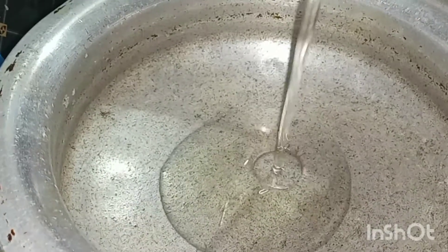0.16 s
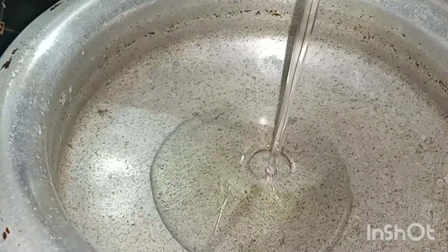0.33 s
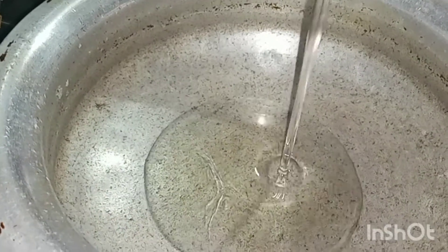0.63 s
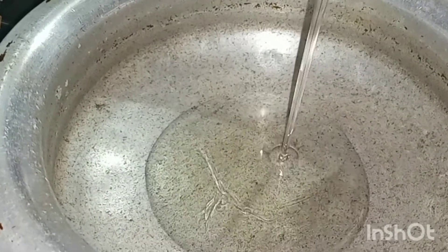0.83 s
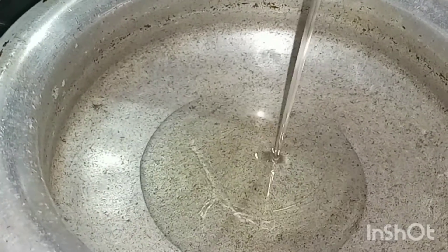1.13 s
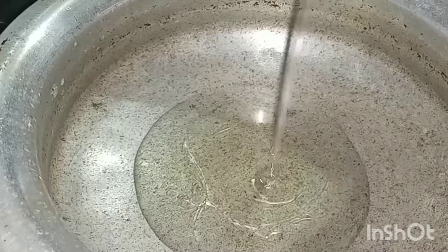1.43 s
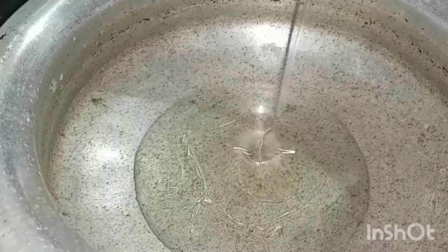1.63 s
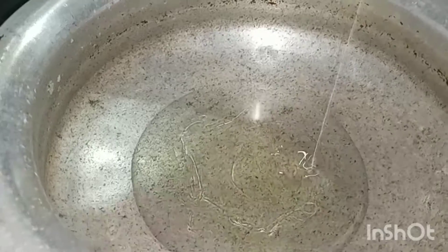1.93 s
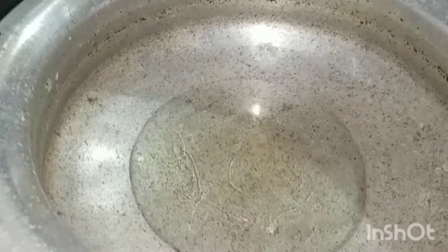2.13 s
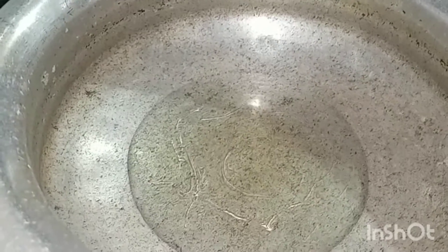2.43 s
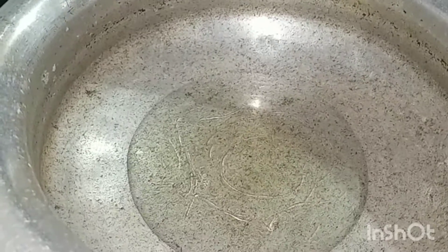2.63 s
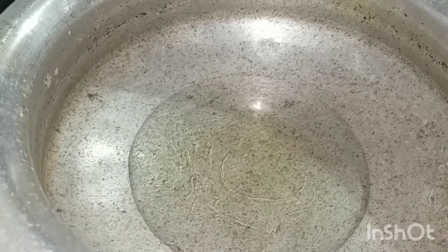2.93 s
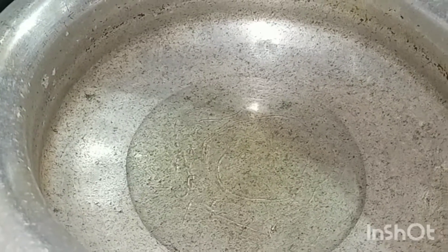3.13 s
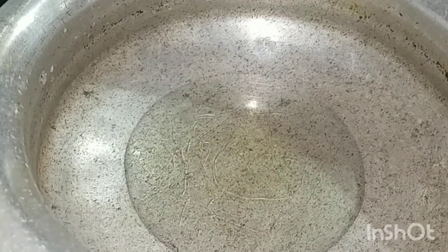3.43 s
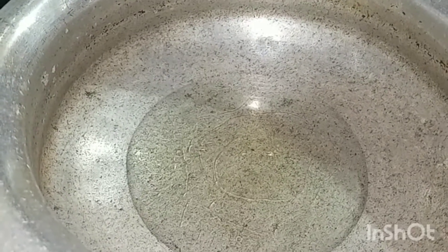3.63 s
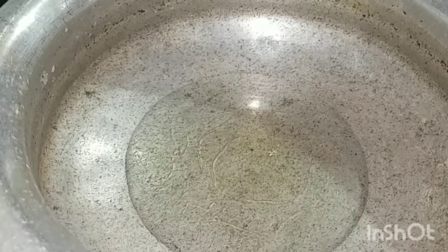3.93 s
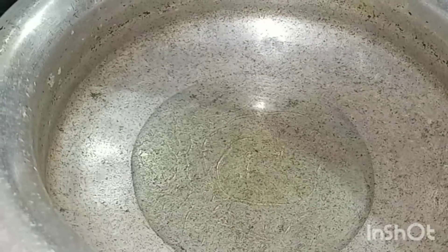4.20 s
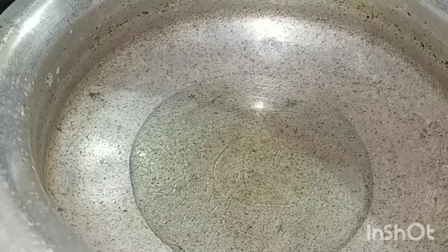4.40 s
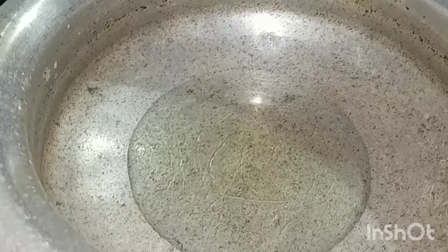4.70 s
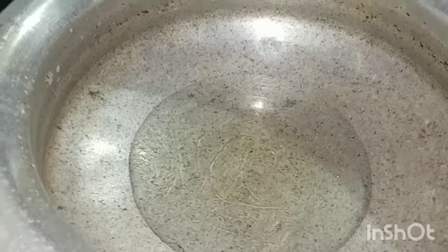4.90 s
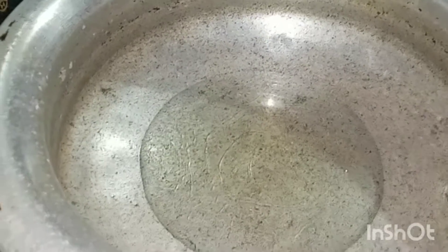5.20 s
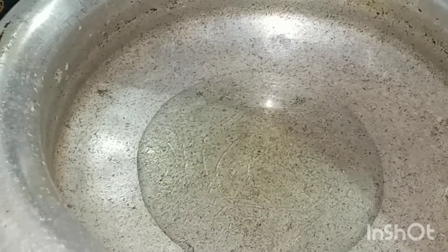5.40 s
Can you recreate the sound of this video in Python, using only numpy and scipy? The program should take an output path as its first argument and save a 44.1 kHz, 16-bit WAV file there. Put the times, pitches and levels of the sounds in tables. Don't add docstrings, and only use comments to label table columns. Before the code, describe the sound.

Steady bright gas flame hiss with small oil pops, one glass clink, a cluster of hollow set-down knocks, then sharp metallic bangle jingles.

```python
import sys
import numpy as np
from scipy import signal
from scipy.fft import rfft, irfft, next_fast_len
from scipy.io import wavfile
from scipy.ndimage import uniform_filter1d, map_coordinates

SR = 44100
rng = np.random.default_rng(int(sys.argv[2]) if len(sys.argv) > 2 else 0)


def materialize(psi):
    bounded = np.clip(np.atleast_2d(psi).T, -1, 1)
    quanta = np.round(bounded * 32767).astype(np.int16)
    wavfile.write(sys.argv[1], SR, quanta)


def linear_from_db(decibels):
    return 10 ** (np.asarray(decibels, float) / 20)


N = 244755


def unit(x):
    return x / np.sqrt(np.mean(x ** 2) + 1e-20)


def along(points, hz):
    f, v = np.transpose(points)
    return np.interp(np.log(hz + 1), np.log(f + 1), v)


def curves(rows):
    s, *cols = np.transpose(rows)
    return [np.interp(np.arange(N) / SR, s, c) for c in cols]


def wobble(rate):
    knots = rng.standard_normal(int(N * rate / SR) + 4)
    return map_coordinates(knots, [np.arange(N) * rate / SR])


def filtered(x, response):
    m = next_fast_len(x.shape[-1] + SR // 2)
    return irfft(rfft(x, m) * response(np.fft.rfftfreq(m, 1 / SR)), m)[..., :x.shape[-1]]


def resonances(modes):
    def response(f):
        total = 0
        for k, (centre, width, db) in enumerate(modes):
            damping = 1j * f * width
            total = total + (-1) ** k * linear_from_db(db) * damping / (centre * centre - f * f + damping)
        return total
    return response


# f/Hz, likeness [0..1]
PORT_LIKENESS = [(30, 0.1), (80, 0.58), (140, 1), (300, 0.88), (480, 0.6), (580, 0.95), (750, 0.29),
                 (950, 0.069), (2500, 0.35), (4000, 0.021), (16000, 0.13)]


def ports(pair, response=lambda hz: 1):
    def mix(hz):
        turn = np.arccos(np.clip(along(PORT_LIKENESS, hz), 0, 1)) / 2
        return response(hz) * np.array([np.cos(turn), np.sin(turn)])
    mid, side = filtered(pair, mix)
    return np.array([mid + side, mid - side])


def rush(response, patchy_db, ripple_db=0):
    z = signal.stft(rng.standard_normal((2, N)), nperseg=1024)[2]
    field = uniform_filter1d(rng.standard_normal(z.shape[1:]), size=7, axis=0)
    field = uniform_filter1d(field, size=4, axis=1)
    ripple = uniform_filter1d(rng.standard_normal((z.shape[1], 1)), size=2, axis=0)
    gain = linear_from_db(patchy_db * unit(field) + ripple_db * unit(ripple))
    pair = signal.istft(z * gain, nperseg=1024)[1][:, :N]
    return unit(ports(pair, response))


def shaped_rush(spectrum, patchy_db, ripple_db=0):
    return rush(lambda hz: linear_from_db(along(spectrum, hz)), patchy_db, ripple_db)


def puffs(times, levels_db, t60s, rise):
    out, t = np.zeros(N + SR), np.arange(SR // 3) / SR
    for s, db, t60 in zip(times, levels_db, t60s):
        out[round(s * SR):][:len(t)] += linear_from_db(db - 60 * t / (t60 + 0.0092)) * (1 - np.exp(-t / rise))
    return out[:N]


def struck(events, modes, scatter_db):
    out, t = np.zeros(N + SR), np.arange(SR // 3) / SR
    hz, level, t60 = np.transpose(modes)[:, :, None]
    onset = 1 - np.exp(-t / 0.00065)
    for s, db, damp in events:
        luck = rng.standard_normal((2, len(modes), 1))
        decay = linear_from_db(level + scatter_db * luck[0] - 60 * t / (t60 * damp + 0.011))
        ring = decay * np.sin(2 * np.pi * hz * t + 2 * np.pi * luck[1])
        out[round(s * SR):][:len(t)] += linear_from_db(db) * ring.sum(axis=0) * onset
    return out[:N]


def touches(events, rise):
    out, t = np.zeros(N + SR), np.arange(SR // 5) / SR
    for s, db, hz, t60 in events:
        ring = linear_from_db(db - 60 * t / (t60 + 0.0021)) * np.sin(2 * np.pi * hz * t)
        out[round(s * SR):][:len(t)] += ring * (1 - np.exp(-t / (rise + 0.63 / hz)))
    return out[:N]


# t/s, level/dB
GAS_FLOW = [(0.0, -37.5), (0.08, -37.5), (1.79, -36.5), (2.19, -42), (2.22, -38.5), (2.44, -37.5),
            (3.28, -37.5), (3.29, -31.5), (3.46, -40.5), (3.63, -34.5), (3.92, -38), (3.96, -32.5),
            (4.05, -32), (4.3, -45), (4.34, -32.5), (4.44, -36.5), (5.32, -37.5), (5.55, -34.5)]
# t/s, level/dB (peak), low part/dB, t60/s
SPUTTERS = [(0.131, -36, -17, 0.038), (0.1665, -32, -8, 0.066), (0.416, -26, -4, 0.035),
            (0.9484, -16.5, -21, 0.03), (1.082, -19, -15, 0.032), (1.2276, -34, -20, 0.16),
            (1.318, -14, -4, 0.017), (2.2144, -34.5, 7, 0.98), (2.319, -18.5, -6, 0.049),
            (2.707, -23, -1.5, 0.061), (2.871, -31, -3, 0.13), (2.922, -22.5, -7, 0.085),
            (3.129, -34.5, 1, 0.33), (3.2854, -24, -27, 0.042), (4.2278, -27, -17, 0.65),
            (4.414, -22, -20, 0.027), (4.418, -19, -29, 0.015), (4.243, -26, -19, 0.026),
            (4.551, -28.5, 1, 0.066), (4.6734, -20.5, -7, 0.036), (4.842, -30, -5, 0.045),
            (5.0384, -30, -4, 0.13), (5.098, -25, -17, 0.083), (5.2594, -27, -14, 0.032),
            (5.3567, -31, -4, 0.064), (5.409, -27, 2, 0.028), (5.4407, -23.5, -8, 0.049)]
# t/s, level/dB (peak)
OIL_SPITS = [(0.2244, -42), (0.2418, -28), (0.3536, -29), (0.4464, -38), (0.9184, -45), (0.9477, -18),
             (1.0839, -43), (1.2226, -29), (1.3179, -39), (1.5204, -22), (1.932, -32), (2.1066, -40),
             (2.9644, -27), (2.9784, -30), (3.2394, -25), (3.2594, -28), (3.3877, -28), (4.9516, -35)]
# t/s, level/dB, t60/s
OIL_POPS = [
    (.951, -29, .02),
    (2.2144, -9.5, 0.006),
    (2.721, -24, 0.0092),
    (3.129, -30, 0.0069),
    (3.14, -25, .008),
    (3.2255, -27, .008),
    (3.385, -16, .008),
    (4.421, -31, 0.012),
    (5.4125, -30, .006),
]
# f/Hz, level/dB (per Hz)
FLAME_SPECTRUM = [(900, -37), (1300, -15.5), (1500, -9), (2000, -2), (2800, 1.5), (3600, 2.5), (4500, 1.5),
                  (5300, -3), (7000, -23.5)]
JET_SPECTRUM = [(4000, -36), (5300, -5.5), (6200, 2), (7400, 0), (8300, -7.5), (9300, -11.5), (11000, -30)]
FIZZ_SPECTRUM = [(7500, -43), (9500, 6.5), (11000, 11), (13000, -0.5), (14000, -7), (15000, 18),
                 (15800, 16.5), (16500, -25)]
# f/Hz, level/dB
DULLED_JET = [(5000, 0), (6400, 3), (7300, -1.5), (8500, -5), (11000, 2)]
FLAME_DB, JET_DB, FIZZ_DB = -35, -35.5, -46.5
FLAME_GROWS, JET_GROWS, FIZZ_GROWS = 0.43, 0.74, 0.21
DULL_S, DULL_LASTS_S = 4.23, .25


def burner():
    strength_db, = curves(GAS_FLOW)
    flow_db = strength_db - strength_db.mean()
    flicker = wobble(14)
    flame = linear_from_db(FLAME_DB + FLAME_GROWS * flow_db + 0.7 * flicker + 0.8 * wobble(24.84))
    jet = linear_from_db(JET_DB + JET_GROWS * flow_db + 0.5 * flicker + 0.81 * wobble(29.9))
    fizz = linear_from_db(FIZZ_DB + FIZZ_GROWS * flow_db + 1.0 * flicker + 0.85 * wobble(17))

    s, db, low_db, t60 = np.transpose(SPUTTERS)
    pops = puffs(*np.transpose(OIL_POPS), rise=0.00029)
    flame += puffs(s, db + low_db - 6.5, t60 * 1.19, rise=0.004) + linear_from_db(-11.5) * pops
    jet += puffs(s, db - 7.5, t60, rise=0.00064) + linear_from_db(-12.5) * pops
    spit_t60s = [0.034] * len(OIL_SPITS)
    fizz += linear_from_db(-6.5) * puffs(*np.transpose(OIL_SPITS), spit_t60s, rise=0.0021)

    open_jet = shaped_rush(JET_SPECTRUM, patchy_db=2.5, ripple_db=0.47)
    dull_jet = filtered(open_jet, lambda hz: linear_from_db(along(DULLED_JET, hz)))
    dulled = np.clip((np.arange(N) / SR - DULL_S) / DULL_LASTS_S, 0, 1)
    hiss = flame * shaped_rush(FLAME_SPECTRUM, patchy_db=2.0, ripple_db=1.0)
    hiss += jet * ((1 - dulled) * open_jet + dulled * dull_jet)
    return hiss + fizz * shaped_rush(FIZZ_SPECTRUM, patchy_db=2.8)


# t/s, length/s, level/dB
TUBE_SURGES = [(0.055, 0.024, -50.5), (0.362, 0.025, -53), (0.493, 0.028, -51), (0.577, 0.17, -50),
               (0.924, 0.062, -52.5), (1.27, 0.054, -47.5), (1.419, 0.058, -53), (1.685, 0.027, -54),
               (1.786, 0.034, -53.5), (1.92, 0.042, -52), (2.028, 0.12, -51), (2.24, 0.16, -46),
               (2.551, 0.048, -53), (2.67, 0.11, -50.5), (3.087, 0.043, -48.5), (3.212, 0.11, -53),
               (3.695, 0.034, -52), (3.775, 0.029, -58), (4.02, 0.09, -53.5), (4.16, 0.059, -50),
               (4.422, 0.23, -50.5), (4.694, 0.15, -50.5), (4.985, 0.37, -47), (5.41, 0.16, -52)]
CATCH_S, FADE_S, IDLE_DB = 0.012, 0.021, -61.5


def surges():
    t = np.arange(N) / SR
    level = linear_from_db(IDLE_DB)
    for s, length, db in TUBE_SURGES:
        corners = np.cumsum([s - CATCH_S, CATCH_S, length, FADE_S])
        level = level + linear_from_db(db) * np.interp(t, corners, [0, 1, 1, 0])
    return level


def tube():
    bore = resonances([(148.1, 20.4, 0)])
    sung = unit(ports(rng.standard_normal((2, N)), lambda hz: bore(hz) ** 2))
    swing = np.sqrt(abs(uniform_filter1d((sung ** 2).mean(axis=0), size=600)))
    return linear_from_db(-0.5) * surges() * unit(sung / (swing + 2.3))


# f/Hz, width/Hz, level/dB
PAN_MODES = [(1465, 99, 1.5), (2011, 37, 1), (819, 29, -4)]


def pan():
    metal = resonances(PAN_MODES)
    return linear_from_db(-49 + 2.6 * wobble(4.77)) * rush(lambda hz: metal(hz) ** 2, patchy_db=4.0)


# t/s, level/dB (peak), decay factor, chatter/dB
JINGLES = [(2.2448, -34, .8, 11), (2.3206, -22.5, 0.98, 9.5), (2.476, -21.5, 0.24, 9),
           (3.3882, -33, 0.84, 10), (3.7554, -31, 0.56, 0), (3.7708, -34, 0.56, 5), (3.8057, -23.5, .5, -8),
           (3.8417, -33, .9, 6), (3.9458, -10, 0.2, -14), (3.950, -9, .2, -12), (3.954, -16, .15, -8),
           (3.9645, -10, 0.4, -12), (3.973, -16, .4, -10), (3.9895, -10, 0.4, -15),
           (3.995, -10.5, 0.34, -14), (4.0185, -14, 0.38, -5), (4.026, -16, 0.37, -14),
           (4.0385, -18, 0.33, -11), (4.048, -26, 0.27, -12), (4.318, -14, 0.57, 1), (4.345, -17, 0.57, 1),
           (4.3595, -14, 0.096, -3), (4.367, -13, 0.14, -10), (4.373, -16, .15, -6), (4.377, -28, 0.63, 3),
           (5.5398, -29, 0.41, 14.5)]
# f/Hz, level/dB, t60/s
BANGLE_MODES = [(8600, -14, 0.17), (9085, -11, 0.42), (9300, -14, 0.16), (13600, -20, 0.095),
                (14300, -12, .1), (13940, -6, .12), (14700, -7.5, 0.2), (14780, 3, .12), (14960, -2, 0.18),
                (15400, -14, .14), (15200, -16, 0.11), (15560, -7, .1), (15720, -12, .08)]
# f/Hz, level/dB (per Hz)
CHATTER_SPECTRUM = [(8000, -29), (9000, -15.5), (10500, -14.5), (12800, -27), (14000, -7), (15000, -17),
                    (16000, -0.5)]
# t/s, level/dB (peak), f/Hz, t60/s
RING_TOUCHES = [(2.2455, -38, 15700, .08), (3.9465, -18, 15560, .05), (3.947, -19, 15160, .05),
                (4.319, -25, 15300, .05), (4.3195, -25, 14200, .05), (3.974, -21, 15300, .01),
                (3.9955, -20, 15100, .01), (4.0385, -21, 15550, .03), (4.3605, -3, 15200, .012),
                (4.3675, -15, 15400, .012), (4.373, -13, 15550, .008), (4.3775, -16, 15350, .012),
                (4.3815, -21, 15200, .008), (4.385, -18, 15000, .01), (4.389, -24, 15100, .015)]


def bangles():
    s, db, damp, chatter_db = np.transpose(JINGLES)
    rings = linear_from_db(-6.5) * struck(np.transpose([s, db, damp]), BANGLE_MODES, scatter_db=0.5)
    contact = puffs(s, db + chatter_db + 1.0, 0.21 * damp, rise=0.0017)
    chatter = contact * shaped_rush(CHATTER_SPECTRUM, patchy_db=-7.0)
    return linear_from_db(-2.0) * (rings + chatter) + linear_from_db(7.5) * touches(RING_TOUCHES, rise=.0008)


def contacts(count):
    first_s, gap_s, first_db, growth_db, damp = 1.526, 0.0043, -24.5, 0.7, 0.46
    return [(first_s + gap_s * k, first_db + growth_db * k, damp) for k in range(count)]


# t/s, level/dB (peak), decay factor
CLINKS = [
    (1.3183, -23, 1),
    (1.3215, -31, 0.8),
    (1.331, -26, 0.62),
]
# t/s, level/dB (peak)
SCUFFS = [(1.252, -28), (1.265, -32), (1.4754, -23), (1.481, -26), (1.487, -30), (1.494, -24), (1.506, -33),
          (1.512, -28), (1.561, -35), (1.571, -30), (1.879, -30)]
# f/Hz, level/dB, t60/s
GLASS_MODES = [(2300, -16, 0.15), (2328, -4.5, 0.67), (2770, 11, 0.085), (2807, -2, 0.17),
               (2925, 1.5, 0.13), (3110, 1.5, 0.078), (3400, 0, 0.074), (3480, -2, 0.041),
               (3890, 11, 0.019), (4720, -0.5, .07), (4490, 6.5, 0.039), (5580, 6, .02), (6560, -15, .025),
               (7140, -8, 0.03)]
CAP_MODES = [(1885, -9, 0.26), (2217, -5, 0.11), (2300, 1.5, 0.14), (2430, -2, 0.062), (2640, -7, .06),
             (2990, -10, 0.069), (3520, -5, .06)]
BASE_MODES = [(2313, 2, 0.1), (2580, 4, 0.059), (2780, 7, 0.072), (3010, 0, 0.054), (3260, -14, 0.032),
              (3680, 3, .04)]


def bottle():
    s, db, _ = np.transpose(CLINKS)
    burst = puffs(s, db - 14, [.03], rise=0.00047) * rng.standard_normal(N)
    snap = filtered(burst, resonances([(4500, 3000, 0)]))
    clink = linear_from_db(-1.5) * struck(CLINKS, GLASS_MODES, scatter_db=0.0)
    rattle = linear_from_db(-3.0) * struck(contacts(count=6), CAP_MODES, scatter_db=3.0)
    scuff_hits = [(*hit, 0.27) for hit in SCUFFS]
    return clink + snap + rattle + linear_from_db(-5.5) * struck(scuff_hits, BASE_MODES, scatter_db=6.0)


# t/s, level/dB (peak), f/Hz, t60/s
SMALL_TAPS = [(1.3195, -18, 3890, 0.036), (1.3195, -26, 4678, .03), (1.3205, -27, 3330, .12),
              (1.33, -29, 2326, 0.37), (1.33, -30, 2891, .3), (1.4755, -16, 2530, 0.014),
              (1.481, -21, 2640, .012), (1.4875, -21, 2710, .012), (1.4935, -20, 2630, 0.015),
              (1.5327, -24, 2720, .015), (1.5387, -28, 2337, 0.09), (1.547, -26, 2929, 0.037),
              (1.7186, -24, 3680, .008), (1.8782, -22, 2320, 0.011), (1.895, -29, 2220, .03),
              (2.205, -19, 1630, .015), (2.2158, -14, 1640, .01), (2.231, -23, 1650, .012),
              (2.242, -24, 1700, .012), (2.271, -24, 1800, .012), (2.266, -27, 740, .03),
              (2.2612, -20.5, 1910, .012), (2.3031, -27, 2400, .01), (2.325, -30, 322, 0.17),
              (2.345, -28, 322, .1), (2.729, -34, 257, 0.055), (2.727, -35.5, 147, 0.053),
              (2.719, -30, 735, .03), (2.716, -33, 872, .05), (2.742, -34, 990, 0.011),
              (2.805, -36, 853, .05), (2.857, -23, 2900, .01), (3.1295, -29, 2070, 0.017),
              (3.348, -28, 3240, .01), (3.549, -29.5, 2070, 0.013), (3.556, -25, 2280, 0.0086),
              (3.8195, -26, 2670, .012)]


def taps():
    return linear_from_db(2) * touches(SMALL_TAPS, rise=.0002)


# t/s, belly level/dB, wall level/dB, edge over wall/dB
THUMPS = [(2.201, -30, -34, 8), (2.209, -40, -31, -3), (2.221, -20.5, -23.5, 1), (2.23, -20, -28, -3),
          (2.239, -35, -28, 2), (2.250, -25, -24.5, -4), (2.259, -29, -23.5, 3), (2.267, -38, -34, -6),
          (2.289, -19.5, -23.5, 2), (2.304, -26.5, -33, -7), (2.331, -25.5, -24.5, -16),
          (2.349, -28, -25, -5), (2.383, -39.5, -33, -10), (2.405, -31.5, -39.5, -6), (2.426, -40, -47, 10),
          (2.436, -51, -34, -6), (2.451, -38, -43, -3), (2.4745, -51, -53, -4), (2.705, -42, -27, -10),
          (2.717, -26, -26, -4), (2.73, -31, -27, -13), (2.739, -27, -35, -8), (2.761, -40, -38, -10),
          (2.774, -49, -33, -2), (2.801, -36, -33.5, 5), (2.819, -40, -32.5, 1), (2.857, -48, -44, -4)]
# f/Hz, width/Hz, level/dB
BELLY_MODES = [(149, 30, -5.5), (241, 35, 0.5), (322, 16, 5.5), (476, 50, -6.5)]
WALL_MODES = [(573, 93, 1), (735, 73, 0), (800, 48, 3), (968, 79, 0.5), (1110, 250, 0)]
EDGE_MODES = [(1650, 460, 1.5), (1880, 97, 9.5), (1950, 110, 9.5)]
# t/s, level/dB (peak), decay factor
RIM_RAPS = [
    (2.2045, -15, 0.25),
    (2.2155, -17.5, 0.3),
    (2.229, -18, 0.36),
]
# f/Hz, level/dB, t60/s
RIM_MODES = [(1490, -7, 0.027), (1640, -4.5, 0.026), (1760, -6, 0.025)]


def thumps():
    s, belly_db, wall_db, edge_db = np.transpose(THUMPS)

    def scrape(level_db, t60, rise, modes, dull_hz, order):
        grit = rng.standard_normal(N) * puffs(s, level_db, 0 * s + t60, rise)
        return filtered(grit, lambda hz: resonances(modes)(hz) / (1 + 1j * hz / dull_hz) ** order)

    knock = scrape(belly_db + 18, 0.063, 0.0017, BELLY_MODES, dull_hz=700, order=2)
    knock += scrape(wall_db + 19.5, 0.036, 0.0016, WALL_MODES, dull_hz=1300, order=2)
    knock += scrape(wall_db + edge_db + 15, 0.03, 0.001, EDGE_MODES, dull_hz=2500, order=2)
    return knock + struck(RIM_RAPS, RIM_MODES, scatter_db=1.5)


# f/Hz, t60/s
KITCHEN_DECAY = [(150, 0.38), (700, 0.53), (2000, 0.28), (6000, 0.24), (15000, 0.12)]


def room(x):
    hz, t, z = signal.stft(ports(rng.standard_normal((2, SR * 2 // 3))), SR, nperseg=256)
    decay = linear_from_db(-60 * t / along(KITCHEN_DECAY, hz)[:, None])
    tail = signal.istft(z * decay, SR, nperseg=256)[1]
    return signal.fftconvolve(x[None], tail / np.linalg.norm(tail[0]), axes=1)[:, :N]


# t/s, length/s, f/Hz, width/Hz, level/dB
NOISE_SMEARS = [(0.101, 0.39, 410, 78, -64), (0.34, 0.39, 800, 31, -61.5), (0.9, 0.39, 374, 100, -56.5),
                (1.253, 0.12, 450, 67, -51.5), (1.502, 0.1, 1270, 200, -54), (1.538, 0.075, 349, 36, -57),
                (2.031, 0.037, 1084, 140, -44.5), (2.425, 0.033, 1960, 120, -36),
                (1.714, 0.31, 2060, 500, -49), (4.299, 0.55, 535, 120, -59.5), (2.63, 0.064, 800, 120, -50),
                (2.529, 0.054, 2020, 500, -39.5), (2.705, 0.12, 1467, 45, -48), (2.855, 0.093, 1465, 45, -42),
                (2.856, .025, 2900, 600, -39), (2.902, 0.045, 3070, 900, -40), (3.063, .045, 1490, 60, -51),
                (3.218, 0.046, 2980, 500, -33.5), (3.265, .035, 3400, 600, -40),
                (3.31, 0.064, 1468, 60, -50.5), (3.382, 0.078, 2390, 700, -37), (4.2, 0.1, 1470, 50, -63),
                (4.266, 0.096, 2230, 500, -39.5), (3.13, 0.061, 910, 420, -49),
                (3.322, 0.36, 870, 865, -53.5), (3.993, 0.16, 570, 32.6, -47), (4.497, 0.17, 990, 170, -55),
                (1.403, 0.56, 1590, 350, -49), (3.405, 0.045, 680, 120, -50), (4.874, 0.11, 1530, 370, -41),
                (4.868, 0.11, 292, 490, -52.5), (4.897, 0.28, 814, 180, -53.5),
                (5.396, 0.15, 866, 360, -52.5)]


def noise_smears():
    far, t = np.zeros((2, N + SR)), np.arange(SR // 2) / SR
    for s, length, hz, width, db in NOISE_SMEARS:
        swell = np.interp(t, np.multiply(length, [0, .15, .7, 1]), [0.7, 1, 1.0, 0.11])
        tone = resonances([(hz, width, 0)])
        noise = ports(rng.standard_normal((2, len(t))), lambda f: tone(f) ** 2)
        far[:, round(s * SR):][:, :len(t)] += linear_from_db(db) * swell * unit(noise)
    return far[:, :N]


# f/Hz, level/dB (per Hz)
AIR_SPECTRUM = [(120, -22), (220, -2), (380, -4.5), (570, -2.5), (830, -11), (1100, -3.5), (1500, -28),
                (2200, -57)]
RUMBLE_SPECTRUM = [(20, -26), (40, -12), (65, 1.5), (110, 7), (180, -3.5), (300, -38)]


def kitchen_air():
    air = linear_from_db(-59 + 3.9 * wobble(6.4)) * shaped_rush(AIR_SPECTRUM, patchy_db=4.0, ripple_db=3.2)
    return air + linear_from_db(-62.0 + 6.3 * wobble(8.8)) * shaped_rush(RUMBLE_SPECTRUM, patchy_db=0.5)


def scene():
    rings, glass, tapped, knock = bangles(), bottle(), taps(), thumps()
    knock_lag = 12
    direct = linear_from_db(-1.0) * np.array([np.roll(knock, knock_lag), knock])
    direct += glass * linear_from_db([[-0.5], [0.5]])
    direct += tapped * linear_from_db([[2.5], [-2.5]])
    direct += rings * linear_from_db([[3], [-4]])
    echo = room(linear_from_db(-4.5) * knock + linear_from_db(-7.5) * glass + linear_from_db(-7) * tapped + linear_from_db(-5.5) * rings[0])
    return burner() + tube() + pan() + direct + echo + noise_smears() + kitchen_air()


# f/Hz, level/dB (under the moment's mean)
SPARED_BANDS = [(800, -24), (6000, -22), (6800, -15.5), (9000, -16), (10200, -23), (14000, -22)]


def thinned(x, depth_db):
    hz, _, z = signal.stft(x, SR, nperseg=2048)
    power = abs(z) ** 2
    nearby = abs(uniform_filter1d(power, size=7, axis=1))
    under_db = 10 * np.log10(nearby / power.mean(axis=(0, 1)) + 1e-12)
    above_db = np.clip(8 * (under_db - along(SPARED_BANDS, hz)[:, None]), -200, 200)
    at_risk = (hz > 3000) | (abs(hz - 600) < 200)
    lost = at_risk[:, None] / (1 + linear_from_db(above_db))
    return signal.istft(z * linear_from_db(depth_db * lost), SR, nperseg=2048)[1][:, :N]


def roll_off(x):
    return signal.sosfilt(signal.butter(12, 17110, fs=SR, output="sos"), x)


# t/s, level/dB (depth), hold/s, release/s
LIMITER_DUCKS = [
    (2.305, -5.5, 0.0053, 0.0037),
    (3.928, -9.5, 0.056, 0.079),
    (4.311, -11.5, 0.045, 0.074),
]
# f/Hz, level/dB (left minus right)
PORT_LEAN = [(100, 2.5), (330, 3.5), (520, 3), (1000, 1.5), (1500, 9.5), (2500, 6), (4500, 9), (6300, 12),
             (7000, 24), (8600, 26), (9700, -2), (10800, -1.5), (13000, -3.5), (15000, 9)]


def record(dry):
    t = np.arange(N) / SR
    attack_s, top_hz, left_lag = 0.0063, 15850, 42
    duck_db = 0
    for s, db, hold, release in LIMITER_DUCKS:
        duck_db = duck_db + np.interp(t, np.cumsum([s, attack_s, hold, release]), [0, db, db, 0])

    def colour(hz):
        return linear_from_db(along(PORT_LEAN, hz) * [[.2], [-.8]]) / (1 + (hz / top_hz) ** 300)

    left, right = filtered(dry, colour)
    heard = linear_from_db(duck_db) * np.array([np.pad(left, (left_lag, 0))[:N], right])
    return roll_off(thinned(heard, depth_db=-20))


dry = scene()
out = record(dry)
materialize(out)
```